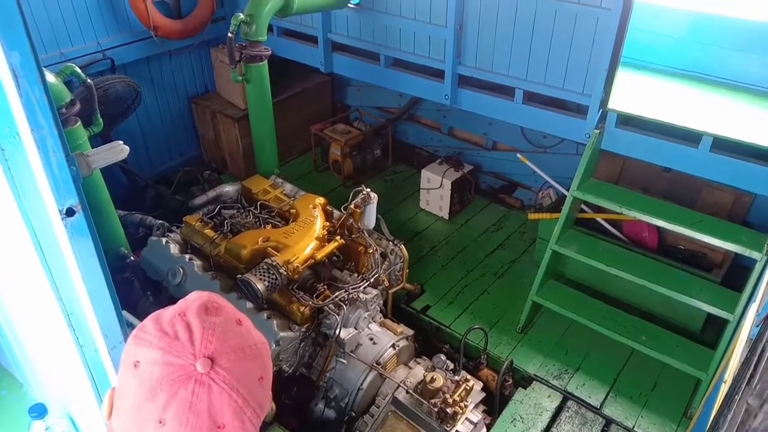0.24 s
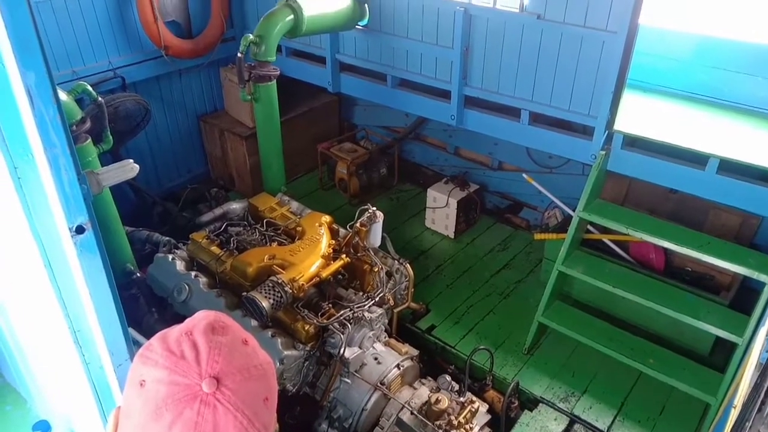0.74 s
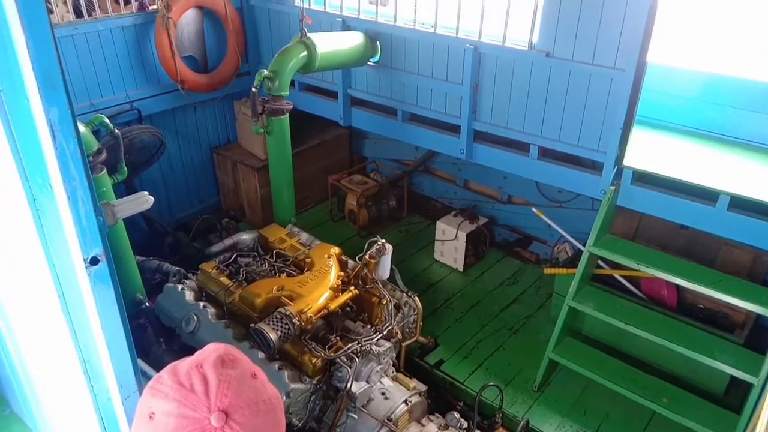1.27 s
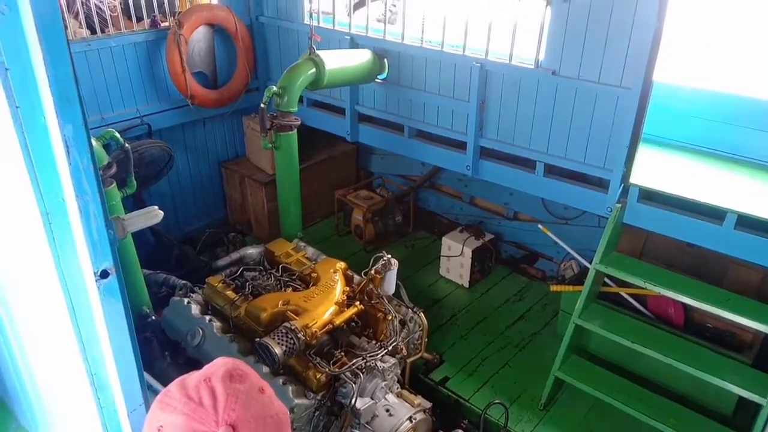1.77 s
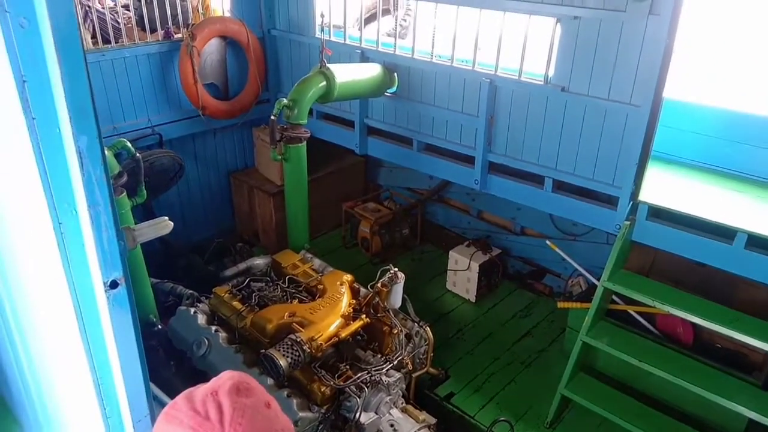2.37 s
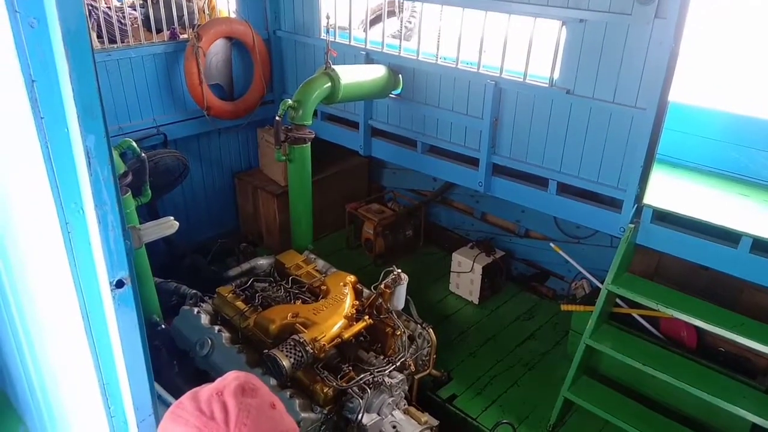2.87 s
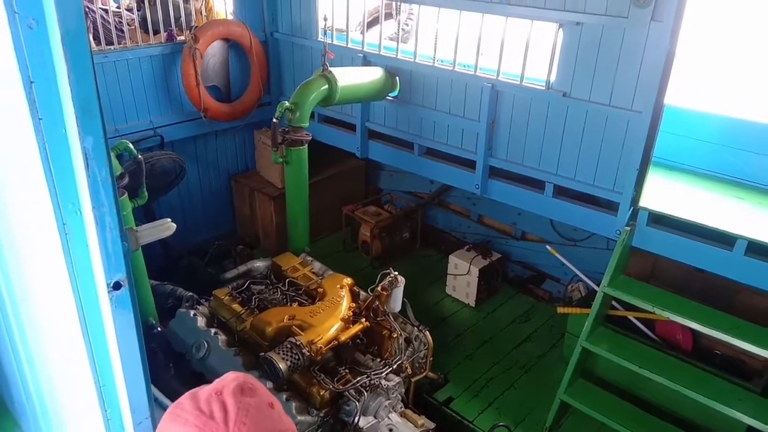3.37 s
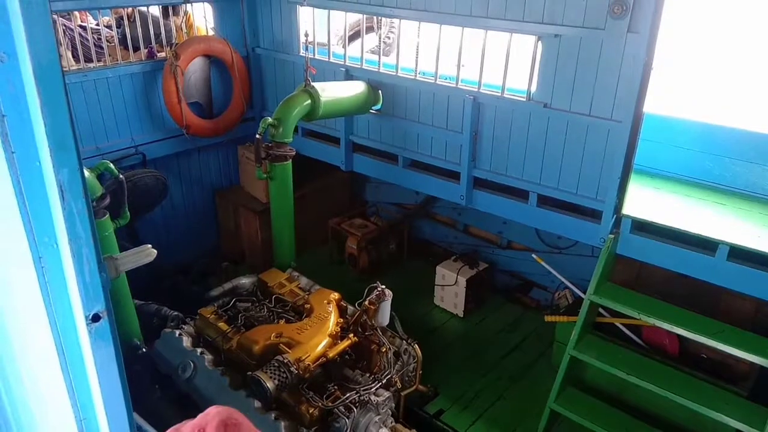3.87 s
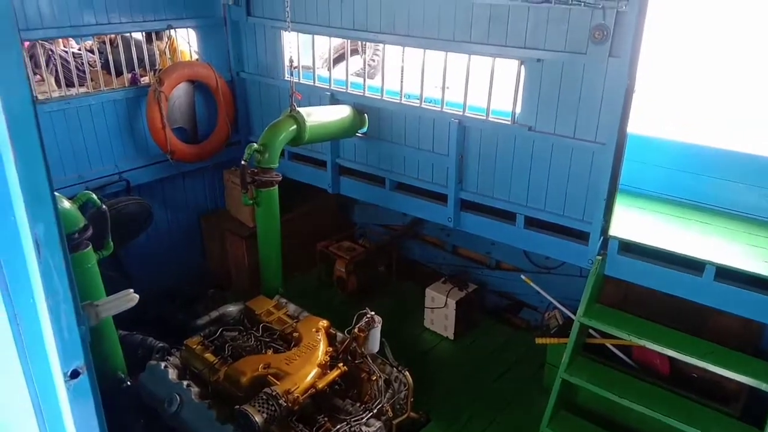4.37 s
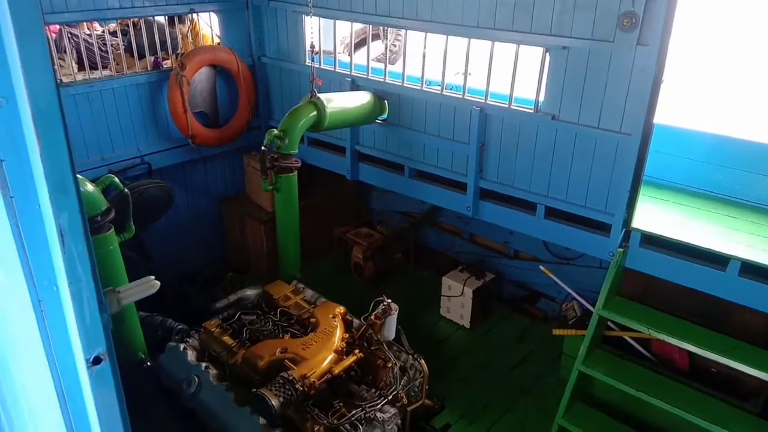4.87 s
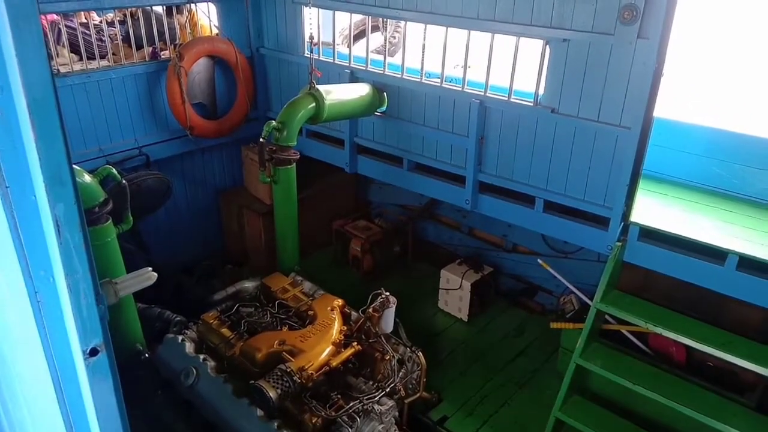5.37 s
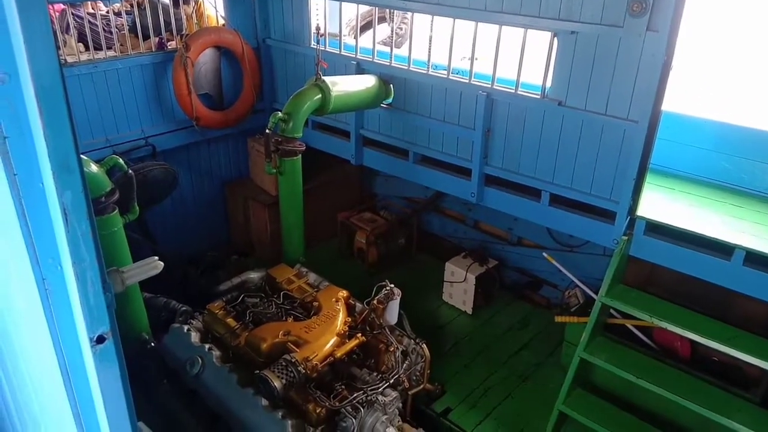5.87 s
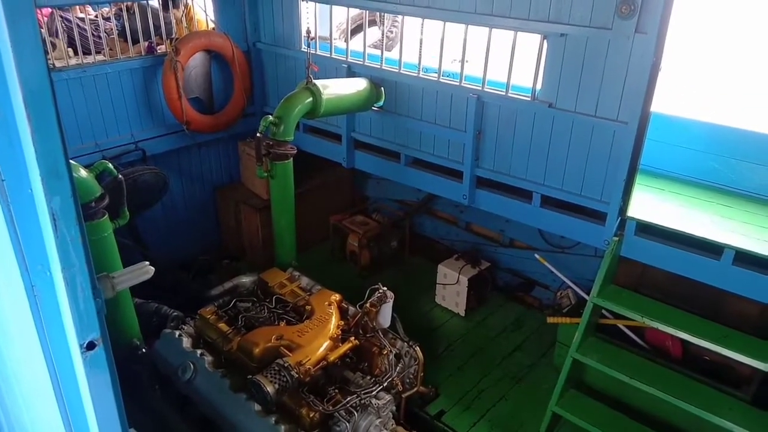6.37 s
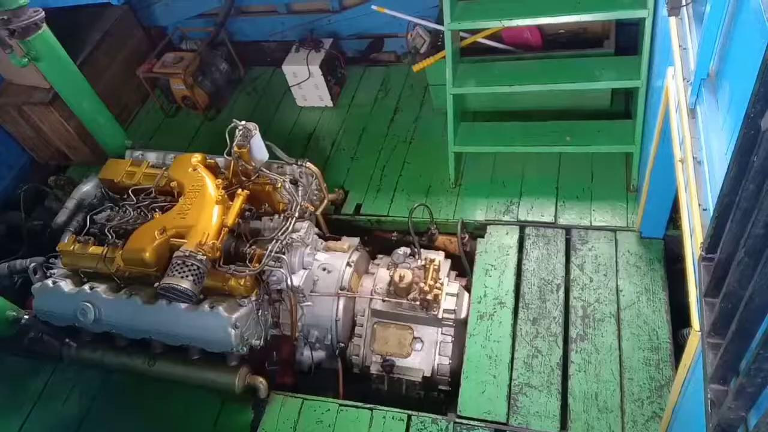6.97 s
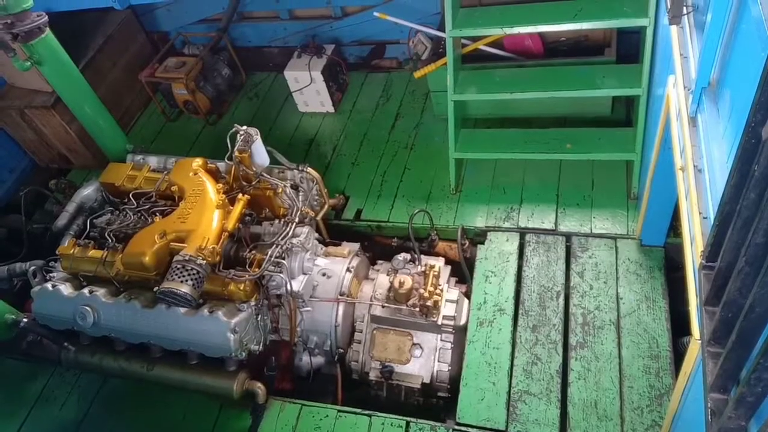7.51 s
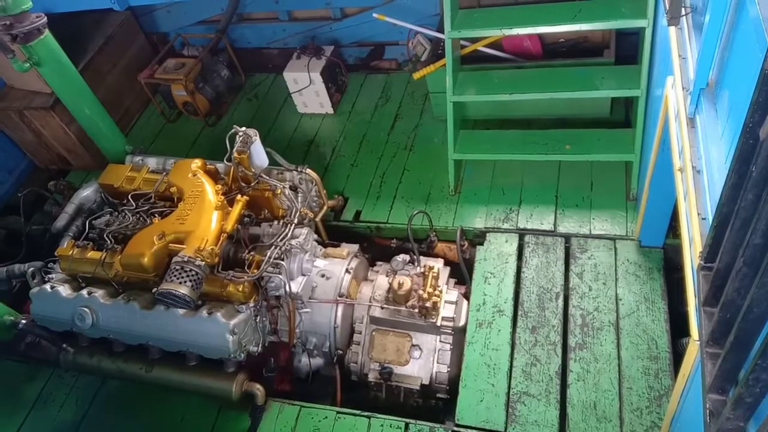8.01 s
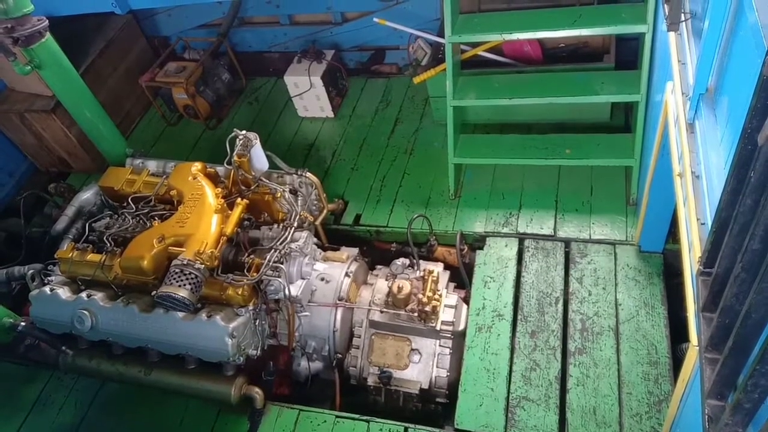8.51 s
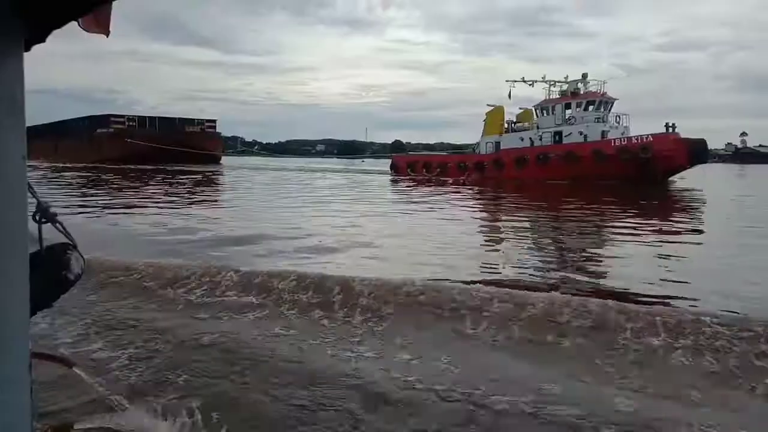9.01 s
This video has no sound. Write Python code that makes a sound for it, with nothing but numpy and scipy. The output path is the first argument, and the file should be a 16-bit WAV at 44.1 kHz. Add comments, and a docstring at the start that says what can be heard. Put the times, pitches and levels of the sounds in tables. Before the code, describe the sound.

Loud, steady inboard diesel at cruising speed, rough low hum with rapid metallic knocking, then a nearer view and a last instant of rushing water outside.

```python
"""A big inboard diesel drones at cruising speed in the wooden engine room of a river boat.
It is heard at once from the doorway, then from above the engine, last on deck by the wash; these two fade in.
Throughout, the engine cycle of two crank turns drives three sources: a hum of cosines on its multiples,
hard knocks replayed from one round of ringing blows, and loose clatter of fresh noise bursts.
A faint high hiss of filtered noise lies under all three spots; filtered noise makes the wash on deck."""
import sys
import numpy as np
from scipy import signal
from scipy.fft import rfft, irfft, next_fast_len
from scipy.io import wavfile
from scipy.ndimage import uniform_filter1d, map_coordinates

SR = 44100
rng = np.random.default_rng(int(sys.argv[2]) if len(sys.argv) > 2 else 0)


def store_pcm(level_fs):
    """Save levels as 16-bit WAV."""
    pcm = np.round(np.clip(level_fs, -1, 1) * 32767).astype(np.int16)
    wavfile.write(sys.argv[1], SR, np.atleast_2d(pcm).T)


N = 407925

# Listening spots (doorway, above the engine, deck) and the balance of the sources at each;
# the doorway's ramp is so short that it starts at once:
# start_s, end_s, ramp_s, hum_db, knock_db, clatter_db, tilt_db_per_octave (above 1 kHz)
LISTENING_SPOTS = [(0, 6.826, 0.00065, 2, 1, -0.5, 0), (6.886, 9.008, 0.28, -2, -2, -2, -1.2),
                   (9.043, 9.3, .25, -1, -1.5, -3, -3)]
# Water along the hull: frequency_hz, density_db_per_hz
WASH_SPECTRUM = [(40, -66), (100, -57), (300, -60), (800, -57), (1800, -60), (4500, -79), (7000, -96),
                 (8200, -115)]
# Faint high hiss: frequency_hz, density_db_per_hz
HISS_SPECTRUM = [(6000, -125), (8700, -110), (10000, -106.5), (12000, -103.5), (14000, -100), (14700, -90),
                 (15600, -92.5)]
# Part of the block's noise that never repeats, before the spot's balance and tilt:
# frequency_hz, doorway_db_per_hz, above_engine_db_per_hz
CLATTER_SPECTRUM = [(25, -63, -73), (50, -62, -57.5), (144, -54, -54.5), (256, -59, -60),
                    (460, -53.5, -51.5), (750, -52.5, -51), (1150, -59, -53.5), (2020, -64.5, -62.5),
                    (2900, -66, -62.5), (4000, -64.5, -61), (5280, -75.5, -70), (6700, -83.5, -78.5),
                    (7470, -92.5, -85.5), (8140, -104.3, -104.3)]
# Part of the block's noise that repeats every cycle, before the spot's balance and tilt:
# frequency_hz, doorway_db_per_hz, above_engine_db_per_hz
KNOCK_SPECTRUM = [(230, -33, -53), (380, -54.5, -48), (475, -51.5, -51.5), (580, -58.5, -56),
                  (700, -55, -48.5), (774, -49.5, -50), (880, -55, -51), (940, -50, -51.6),
                  (1030, -56.5, -53.8), (1340, -59.5, -56), (1970, -64.5, -60), (2900, -73, -67),
                  (4000, -80.5, -69), (6500, -89, -86.2)]
# Covers and pipes that ring under the blows:
# centre_hz, width_hz, doorway_lift_db, above_engine_lift_db
PANEL_RESONANCES = [(1178, 57, 2, 3.5), (1398, 40, 3, 0), (1590, 36, -0.5, 5), (1820, 60, 4.5, 1),
                    (2290, 17, 6.5, 2), (3740, 400, 1.5, 0.5), (4250, 240, 1.5, 2.5), (6540, 250, 3.5, 3.5)]
# Strong multiples of the engine cycle, before the spot's balance:
# order (rounded to a whole number), doorway_db, above_engine_db, deck_db
HUM_LINES = [(3, -54, -54.1, -51), (5, -31.5, -31, -26.5), (7, -54, -58, -49.5), (8, -48.5, -53, -33.8),
             (10, -38.5, -34.5, -49), (11, -40, -37, -48.4), (12, -41, -43.5, -38.9), (13, -48.5, -37, -55),
             (15, -29, -26.5, -26.5), (16, -43, -40, -40), (17, -40.5, -33.5, -39.2), (18, -43.5, -39, -40),
             (20, -43.5, -35.5, -51.6), (21, -45.5, -36.5, -56.6), (22, -51, -48, -51), (23, -51, -59, -46),
             (24, -48, -33, -36), (26, -31.5, -23, -41.6), (37, -40.5, -38.5, -43), (40, -37, -36, -47.5),
             (42, -37, -38, -38), (45, -37, -34, -41), (56, -41.1, -33.5, -48), (74.86, -35, -32.5, -42.3),
             (78, -36.5, -32, -39.4), (80, -39, -36.5, -45), (89.93, -40, -42, -42.9),
             (109.8, -43, -42, -45)]
# Frequency bands of the engine that come and go as the listener sways and leans:
# from_hz, to_hz, sway_db (rms), lean_db (per unit of lean)
SWAYING_BANDS = [(300, 345, .6, -1.6), (620, 1000, .3, -.3), (1000, 2200, .2, -1.9), (2200, 7000, .2, .4)]
# The listener leans in through the doorway and back: time_s, lean (no unit, 0 = usual place)
LEAN_PATH = [(.3, 0), (2.1, -.45), (2.9, .6), (4.4, .6), (5.6, -.3), (7.2, 0)]
# Slow opening of the treble indoors: time_s, level_db
TREBLE_PATH = [(1.8, -.9), (2.7, -.4), (5.3, .4), (8, .5)]

CRUISE_RPM = 1484
HUNT_RPM, HUNT_PERIOD_S, HUNT_PEAK_S = 4.5, 2.2, 2.1  # the governor's slow swing, fastest at the peak
SWAY_HZ = .8
TREBLE_FROM_HZ = 2200
EDGE_HZ = 15550  # upper band limit


def from_db(db):
    """Level and amplitude: 20 dB is a factor of ten."""
    return 10 ** (np.asarray(db) / 20)


def unit(x):
    """Normalization: scales a signal to rms 1."""
    return x / np.sqrt(np.mean(x ** 2) + 1e-20)


def read(table, hz, axis=1):
    """Interpolation: one column of a spectrum on a log-frequency axis."""
    columns = np.transpose(table)
    return np.interp(np.log(hz + 1), np.log(columns[0] + 1), columns[axis])


def colour(x, gain):
    """Linear filtering: multiplies the spectrum of x by a gain that is a function of frequency."""
    size = next_fast_len(N)
    spectrum = rfft(x, size)
    hz = np.fft.rfftfreq(size, 1 / SR)
    return irfft(spectrum * gain(hz), size)[:N]


def white():
    """White noise: equal power, 1 per Hz, at all frequencies."""
    return rng.standard_normal(N) * np.sqrt(SR / 2)


def wander(rate_hz):
    """Band-limited chance: smooth random motion of rms 1, up to about this rate."""
    return unit(colour(rng.standard_normal(N), lambda hz: np.exp(-(hz / rate_hz) ** 2)))


def brighten(hz, tilt_db):
    """Spectral tilt: a treble slope in dB per octave that starts at 1 kHz."""
    octaves = np.log2(np.maximum(hz / 1000, 1))
    return from_db(tilt_db * octaves)


def rush(spectrum, swell_db, swell_hz):
    """Broadband flow noise: noise of a given colour that swells and sinks."""
    noise = colour(white(), lambda hz: from_db(read(spectrum, hz)))
    return noise * from_db(swell_db * wander(swell_hz))


def panels(hz, axis):
    """Resonance: covers and pipes lift the level near their own frequencies, as heard from one side."""
    total_db = 0
    for centre_hz, width_hz, *lift_db in PANEL_RESONANCES:
        detuning = 2 * (hz - centre_hz) / width_hz
        total_db = total_db + lift_db[axis - 1] / (1 + detuning ** 2)
    return from_db(total_db)


def blows(cycle_hz, ring_s, uneven_db, count=30, size=16384):
    """Impact and decay: firings and closing valves strike at their own angle and force, and ring out."""
    force = from_db(uneven_db * rng.permutation(np.linspace(-1, 1, count)))
    angle = (np.arange(count) + rng.random(count)) / count  # fraction of a cycle
    since_s = (np.arange(size) / size - angle[:, None]) % 1 / cycle_hz
    power = force ** 2 @ np.exp(-2 * since_s / ring_s)
    loudness = np.sqrt(power)
    # the engine pulls evenly over each quarter of the cycle
    quarter_mean = uniform_filter1d(loudness, size // 4, mode="wrap")
    return unit(loudness / quarter_mean)


def clatter(cycles, cycle_hz, axis, tilt_db, ring_s=.009, uneven_db=3, loose_db=0.2, loose_hz=70):
    """Modulated noise: valve gear and injectors give a burst at every blow, never quite the same."""
    strikes = blows(cycle_hz, ring_s, uneven_db)
    place = (cycles % 1 * len(strikes)).astype(int)
    bursts = strikes[place] * from_db(loose_db * wander(loose_hz))

    def gain(hz):
        """Band limits: the clatter's colour, closed at both ends."""
        low_pass = 1 / (1 + (hz / 8400) ** 40)
        high_pass = hz ** 4 / (hz ** 4 + 29 ** 4)
        level = from_db(read(CLATTER_SPECTRUM, hz, axis))
        return low_pass * high_pass * level * panels(hz, axis) * brighten(hz, tilt_db)

    return colour(white() * bursts, gain)


def knock(cycles, cycle_hz, axis, tilt_db, ring_s=.005, uneven_db=4.0, drift=0.59, drift_hz=0.351,
          even=.4, count=40):
    """Periodicity: a round of ringing blows replayed every cycle has a line spectrum; its echoes drift."""
    strikes = blows(cycle_hz, ring_s, uneven_db)
    direct, echoes = rfft(strikes * rng.standard_normal((2, len(strikes))))
    order = np.arange(len(direct))
    hz = order * cycle_hz
    t = np.linspace(0, len(cycles) / SR, count)[:, None]

    def even_out(z):
        """Multipath mixing: many paths through the room even out the strengths of the lines."""
        return z / abs(z) * unit(abs(z) ** (1 - even))

    direct, echoes = even_out(direct), even_out(echoes)
    # the echoes' phases shift as the listener moves
    shift = np.exp(2j * np.pi * t * drift_hz * rng.standard_normal(len(hz)))
    lines = (direct + drift * echoes * shift) / np.hypot(1, drift)
    # the bass and the strong multiples belong to the hum
    band = np.interp(hz, [315, 360, 7000, 7500], [0, 1, 1, 0])
    heard = band * ~np.isin(order, np.round(np.transpose(HUM_LINES)[0]))
    level = from_db(read(KNOCK_SPECTRUM, hz, axis)) * np.sqrt(cycle_hz / 2)  # density to line strength
    gain = heard * level * panels(hz, axis) * brighten(hz, tilt_db)
    rounds = irfft(lines * gain) * len(strikes)
    # blend from each round to the next while reading along the cycle
    where = [np.linspace(0, count - 1, len(cycles)), cycles % 1 * len(strikes)]
    return map_coordinates(rounds, where, order=1, mode="grid-wrap")


def crank(flutter=0.002213, flutter_hz=9, load_rpm=1.8, load_hz=1.5):
    """Four-stroke kinematics: a cycle takes two turns; integrates speed as governor and load vary it."""
    t = np.arange(N) / SR
    hunt = HUNT_RPM * np.cos(2 * np.pi * (t - HUNT_PEAK_S) / HUNT_PERIOD_S)
    rpm = CRUISE_RPM + hunt + load_rpm * wander(load_hz)
    cycle_hz = rpm / 120
    return np.cumsum(cycle_hz * (1 + flutter * wander(flutter_hz))) / SR


def hum(cycles, axis, waver_db_per_root_order=.16, sway_db_per_order=0.0266, jitter_cycles=.0007):
    """Harmonic series: exhaust and hull sing on exact multiples of the cycle; the deepest is steadiest."""
    def chance(count):
        """Random interpolation: a new value every so many cycles, joined by straight lines."""
        knots = np.arange(cycles[0], cycles[-1] + 2 * count, count)
        return np.interp(cycles, knots, rng.standard_normal(len(knots)))

    out = np.zeros(len(cycles))
    for row in HUM_LINES:
        order = round(row[0])
        # combustion varies quickly; standing waves sway the short wavelengths slowly
        waver_db = waver_db_per_root_order * np.sqrt(order) * chance(count=1)
        sway_db = sway_db_per_order * order * chance(count=9)
        # ignition comes a little early or late, which roughens the high multiples
        turns = order * (cycles + jitter_cycles * chance(count=1)) + rng.random()
        out += from_db(row[axis] + waver_db + sway_db) * np.sqrt(2) * np.cos(2 * np.pi * turns)
    return out


def turn(x):
    """Position-dependent gain: bands advance and recede with lean and sway; the treble opens."""
    t = np.arange(N) / SR
    lean = np.interp(t, *np.transpose(LEAN_PATH))
    for lo_hz, hi_hz, sway_db, lean_db in SWAYING_BANDS:
        change_db = lean_db * lean + sway_db * wander(SWAY_HZ)
        band = colour(x, lambda hz: (hz > lo_hz) & (hz < hi_hz))
        x = x + (from_db(change_db) - 1) * band
    treble_db = np.interp(t, *np.transpose(TREBLE_PATH))
    treble = colour(x, lambda hz: hz > TREBLE_FROM_HZ)
    return x + (from_db(treble_db) - 1) * treble


def scene(burn_db=1.3, burn_hz=45):
    """Superposition: the sources of one engine add up at three spots in turn."""
    cycles = crank()
    t = np.arange(N) / SR
    out = np.zeros(N)
    cycle_hz = cycles[-1] / t[-1]
    burn = unit(from_db(burn_db * wander(burn_hz)))  # no two firings are equally hard
    hiss = rush(HISS_SPECTRUM, swell_db=1.0, swell_hz=30)
    for spot, (start, end, ramp_s, hum_db, knock_db, clatter_db, tilt_db) in enumerate(LISTENING_SPOTS):
        here = (t >= start) & (t < end)
        side = 1 + spot % 2  # the deck hears the engine through the doorway
        sound = hiss + from_db(clatter_db) * clatter(cycles, cycle_hz, side, tilt_db)
        knocks = burn[here] * knock(cycles[here], cycle_hz, side, tilt_db)
        sound[here] += from_db(knock_db) * knocks
        sound[here] += from_db(hum_db) * hum(cycles[here], spot + 1)
        on_deck = spot == 2
        if on_deck:
            sound = sound + rush(WASH_SPECTRUM, swell_db=-1.0, swell_hz=11.6)
        else:
            sound = turn(sound)
        ramp = np.clip((t - start) / ramp_s, 0, 1)
        out += sound * here * ramp
    return out[None]


def record(dry, ceiling=0.47):
    """Saturation and band limiting: the loudest peaks are rounded off, then the top is cut."""
    rounded = dry / (1 + (dry / ceiling) ** 4) ** (1 / 4)
    # only the part of the rounding below 6.5 kHz is kept
    smooth = signal.firwin(101, 6500, fs=SR)[None]
    held = dry + signal.oaconvolve(rounded - dry, smooth, "same")
    band_limit = signal.firwin(511, EDGE_HZ, window=("kaiser", 9), fs=SR)[None]
    return signal.oaconvolve(held, band_limit, "same")


dry = scene()
out = record(dry)
store_pcm(out)
```